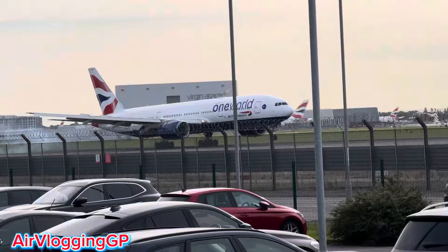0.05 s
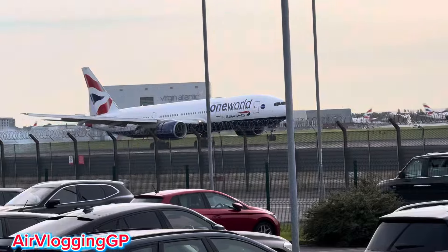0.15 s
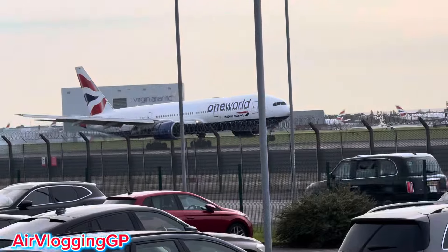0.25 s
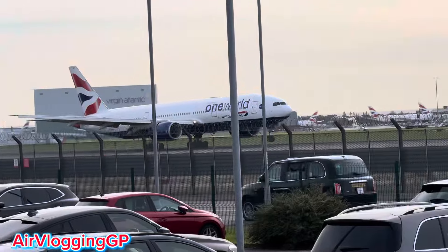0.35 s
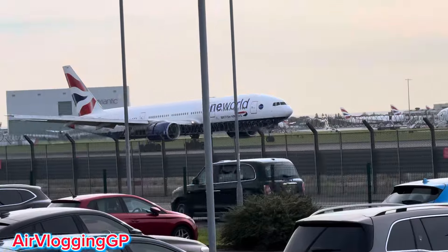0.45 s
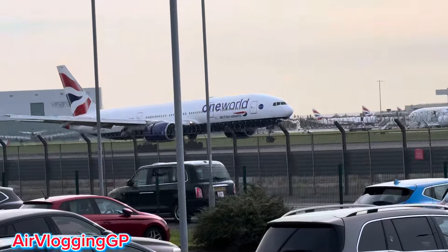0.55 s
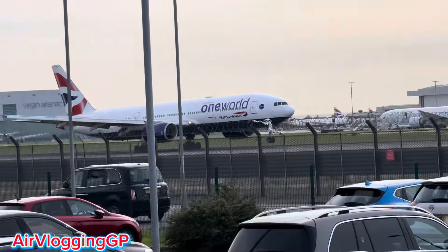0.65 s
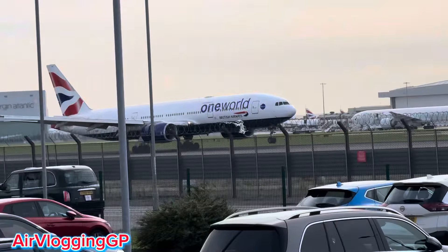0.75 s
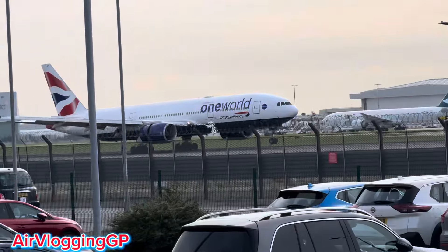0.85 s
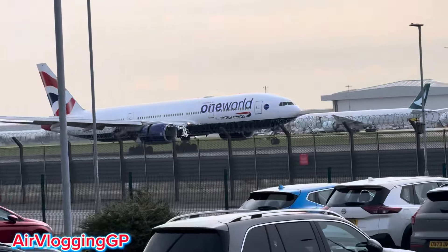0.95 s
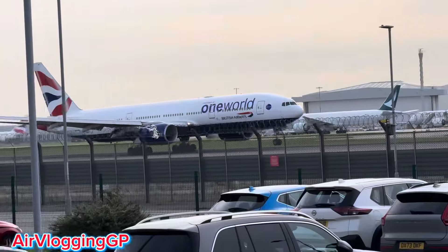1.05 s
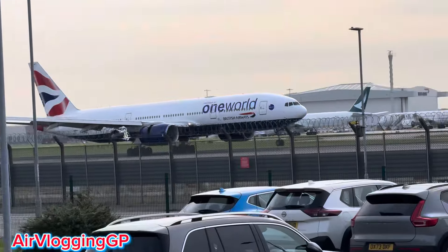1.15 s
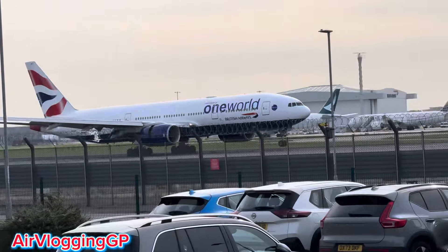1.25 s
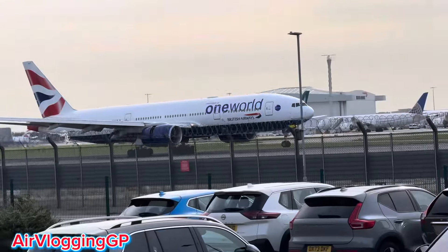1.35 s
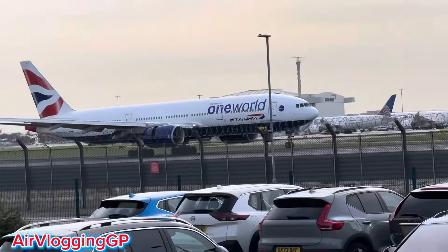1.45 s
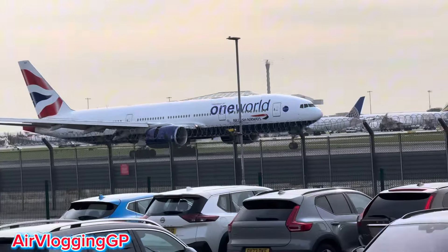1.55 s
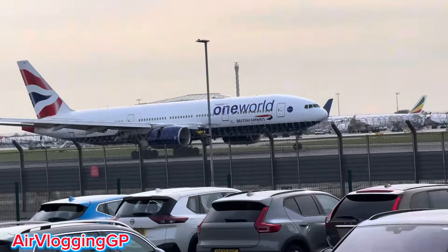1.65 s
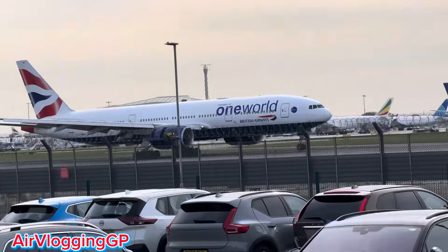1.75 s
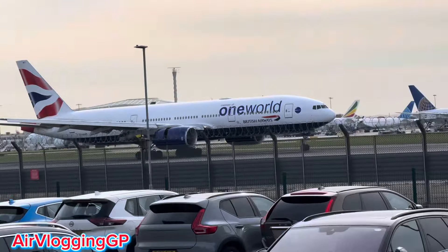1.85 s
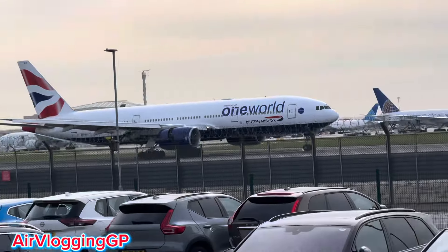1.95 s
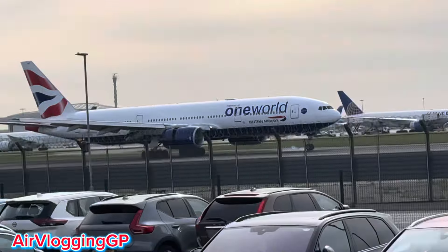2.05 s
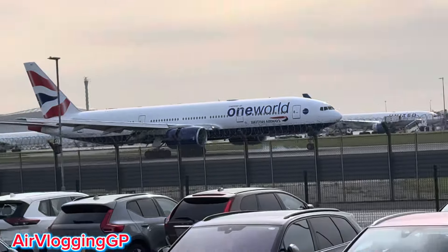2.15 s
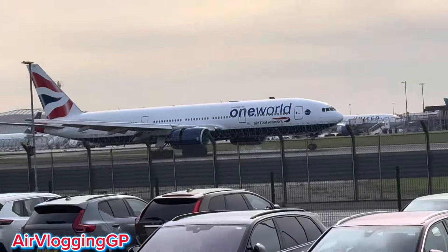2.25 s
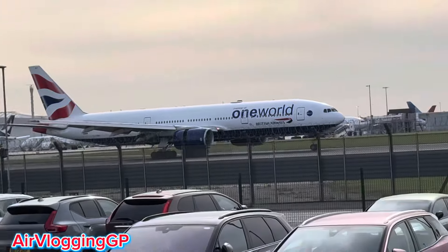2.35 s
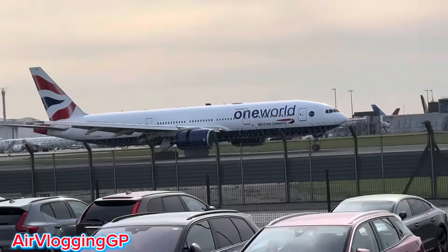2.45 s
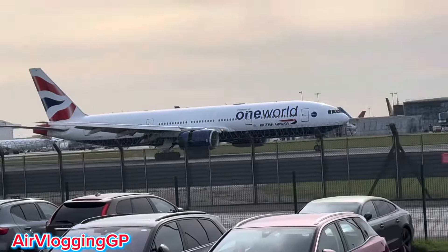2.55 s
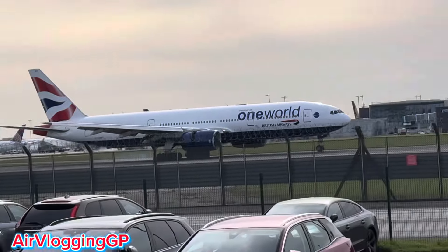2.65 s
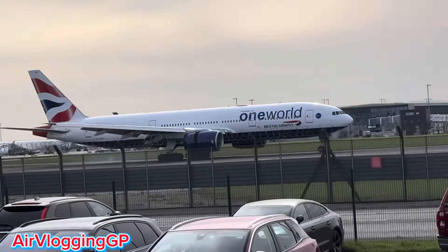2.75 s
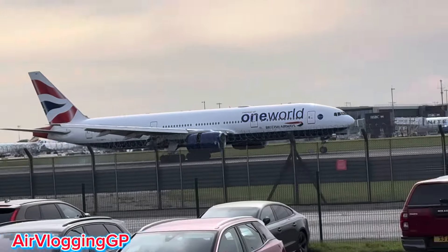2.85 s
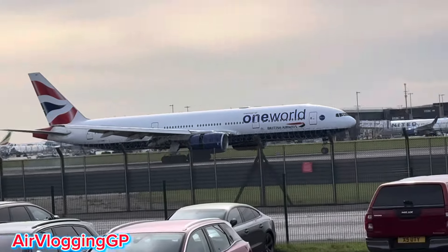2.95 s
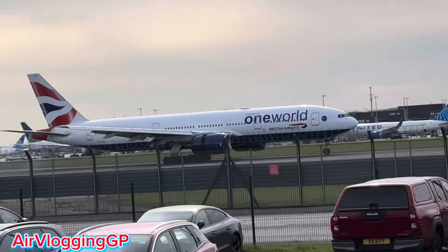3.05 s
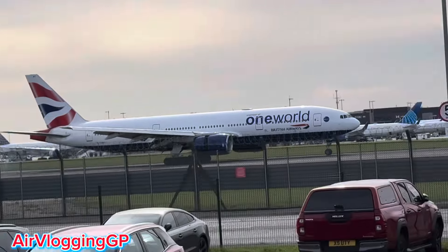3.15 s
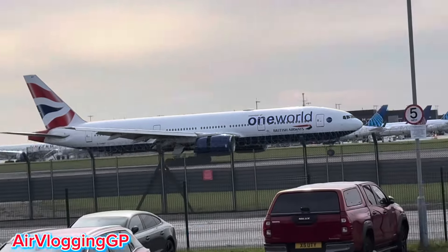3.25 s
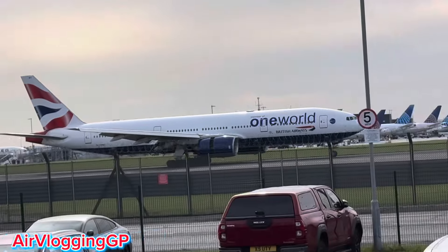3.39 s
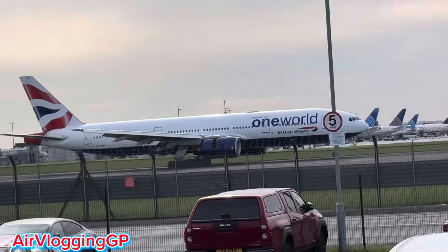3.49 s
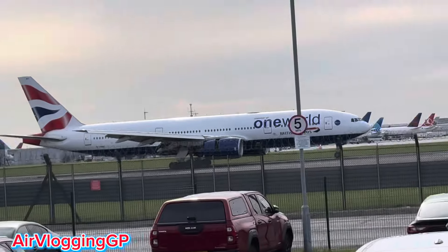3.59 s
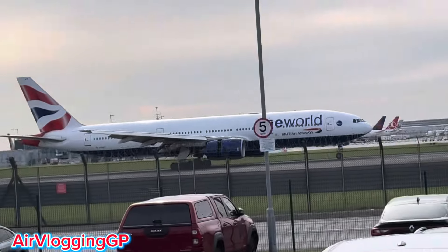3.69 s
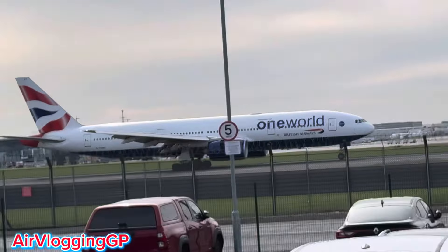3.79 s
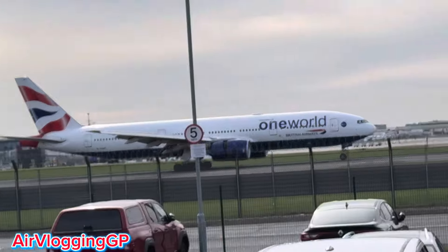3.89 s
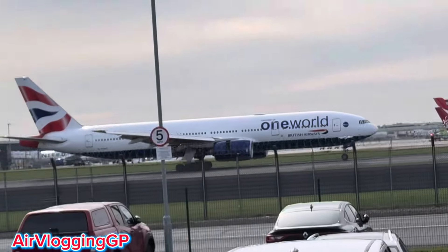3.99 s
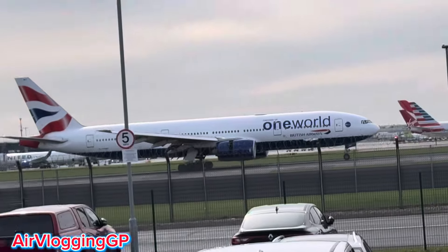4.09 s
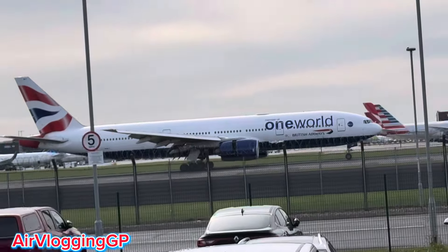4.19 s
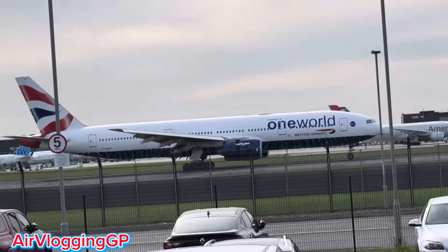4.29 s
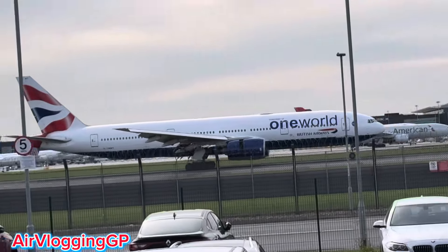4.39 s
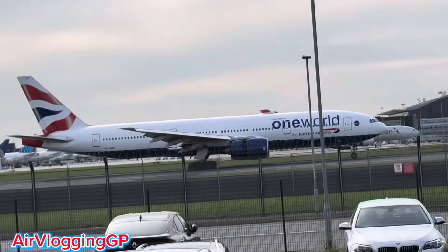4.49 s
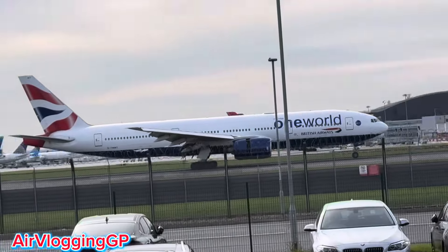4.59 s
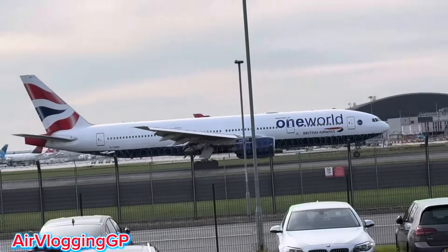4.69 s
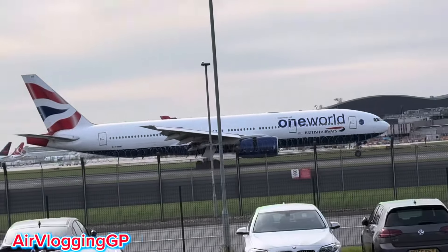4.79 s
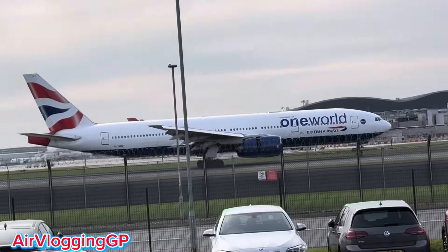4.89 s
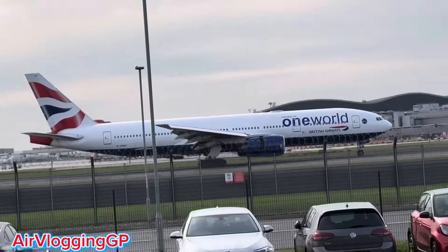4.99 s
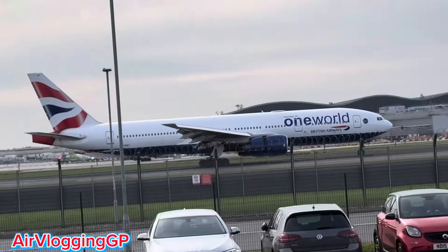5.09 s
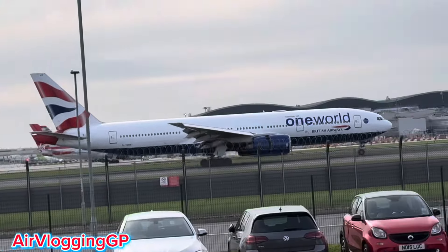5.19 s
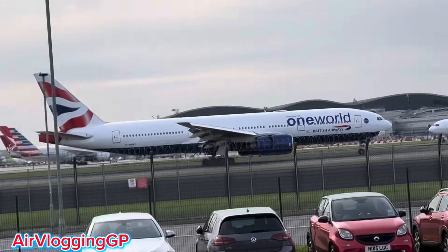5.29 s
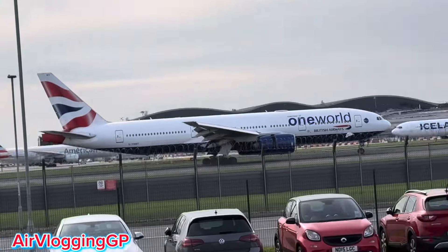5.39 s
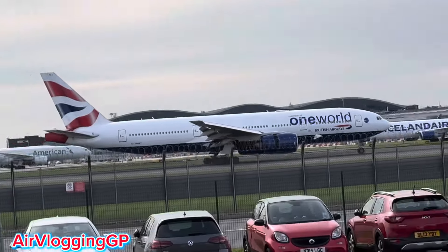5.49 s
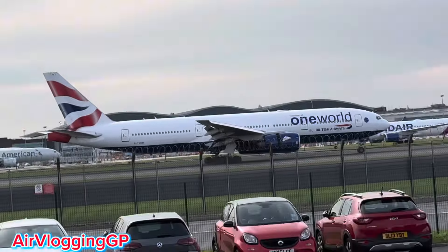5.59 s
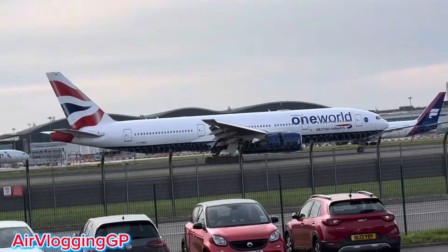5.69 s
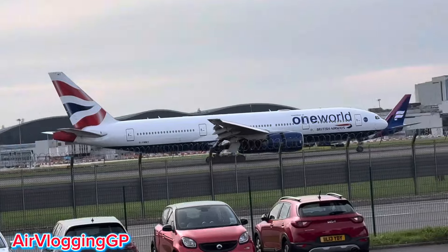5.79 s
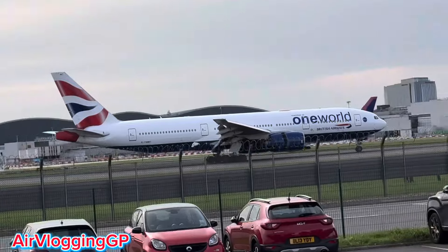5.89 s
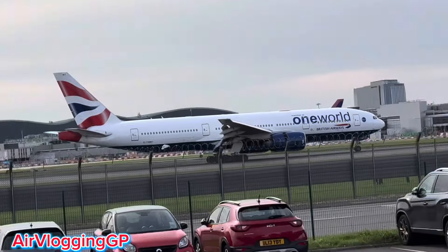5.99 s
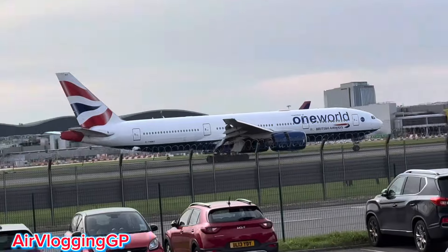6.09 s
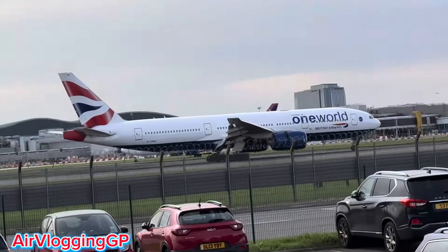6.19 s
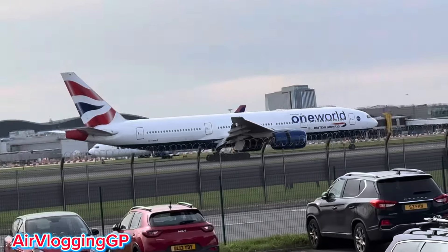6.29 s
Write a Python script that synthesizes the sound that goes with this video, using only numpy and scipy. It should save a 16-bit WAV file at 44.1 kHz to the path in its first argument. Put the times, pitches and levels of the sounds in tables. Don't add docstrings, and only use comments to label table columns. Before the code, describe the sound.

Outdoors beside an airport car park, a large jet rolls past some hundred metres away. A deep rumble and wavering intake howl come first, with a faint high fan tone and a brief tyre scrub. The roar builds in uneven surges to a full reverse-thrust rush midway, then eases but keeps rumbling. A handheld phone picks up light wind buffeting and tiny case ticks.

```python
import sys
import numpy as np
from scipy import signal
from scipy.fft import rfft, irfft, next_fast_len
from scipy.io import wavfile
from scipy.ndimage import uniform_filter1d

SR = 44100
rng = np.random.default_rng(int(sys.argv[2]) if len(sys.argv) > 2 else 0)


def wrap_up_sound(samples):
    columns = np.atleast_2d(samples).T
    tamed = np.clip(columns, -1, 1)
    steps = np.round(tamed * 32767).astype(np.int16)
    wavfile.write(sys.argv[1], SR, steps)


def boost(x):
    u = np.asarray(x, float) / 20
    return 10 ** u


N = 279583
T = np.arange(N) / SR
SIZE = next_fast_len(N)
HZ = np.maximum(np.arange(SIZE // 2 + 1) * SR / SIZE, 1.)

# peak_s, peak_db, length_s
GUSTS = [
    (1.224, -37, .05),
    (1.5, -32, 0.18),
    (2.4, -39.5, .3),
    (3.409, -43.5, 0.74),
    (4.603, -28, 0.045),
    (5.25, -42, 0.13),
    (5.847, -38.5, .2),
]
GUST_FLOOR_DB = -56
# start_s, peak_db
TICKS = [
    (2.373, -70),
    (2.399, -61),
    (3.311, -66),
    (3.389, -65.5),
    (4.9, -66),
]
# time_s, level_db
CAR_HISS = [(0, -93), (.3, -87.5), (.5, -82.5), (.62, -85.5), (.75, -84), (.84, -91), (1.2, -94),
            (1.65, -93), (2.1, -99)]
# freq_hz, unrelated_share_db, left_minus_right_db, left_phase_lead_rad
PORTS = [(40, -34.5, 0, 0), (100, -26.5, 0, 0.014), (250, -12.5, -0.2, .3), (523, -11, -0.5, 0.8),
         (1000, -12, 1.2, 0.75), (1450, -4, 3.5, 0), (1900, -14.5, 5, 0.029), (2080, -17, -3, 0.069),
         (2140, -45, 0, 0), (7600, -47.5, 0, 0.081), (9000, 4.5, -0.5, 0.1)]

# time_s, pitch_hz, level_db
SCRUB = [(1.88, 1450, -51), (2.0, 1638, -35.5), (2.06, 1873, -35), (2.16, 1900, -54)]
# time_s, pitch_hz, level_db
FAN_TONE = [(.5, 3150, -76), (.85, 3260, -68), (1.1, 3250, -68), (1.32, 3210, -66), (1.45, 3100, -62),
            (1.9, 3173, -61), (2.2, 3090, -57)]
# time_s, pitch_hz, level_db
HOWL_OVERTONE = [(1.8, 746, -42), (2.0, 793, -38.5), (2.2, 835, -41), (2.4, 820, -45.5), (2.6, 790, -47)]
# time_s, pitch_hz, level_db
HOWL = [(0, 578, -45), (.6, 561, -45.5), (1.0, 531.4, -42), (1.25, 522, -40), (1.42, 528, -48.5),
        (1.5, 545.7, -43.5), (1.93, 517, -38), (2.28, 541, -36), (2.5, 528, -51)]

# peak_s, peak_db, length_s, centre_hz, width_octaves
PUFFS = [(0.597, -38, 0.049, 563, .031), (.81, -38, .03, 810, .18), (.92, -41.5, 0.055, 900, 0.34),
         (1.32, -49, 0.034, 3260, .03), (1.893, -42, 0.046, 1810, 0.2), (2.077, -52, 0.23, 4100, .35),
         (1.94, -34, 0.065, 500, .07), (2.797, -36.5, 0.049, 535, 0.022), (2.304, -25.5, 0.11, 140, .2),
         (2.978, -21.5, .1, 146, 0.17), (3.35, -33, 0.055, 2740, 0.34), (3.67, -27, 0.18, 662, 0.18),
         (4.325, -38, 0.17, 1500, .08), (4.416, -27.5, .12, 216, 0.33), (4.45, -35.5, .052, 2550, 0.081),
         (4.8, -37, 0.059, 2620, 0.092), (5.094, -40.5, 0.075, 2340, 0.11),
         (5.345, -36.5, 0.058, 695, .038), (5.396, -53, 0.073, 4500, .4), (5.772, -43, 0.042, 4200, 0.41),
         (6.064, -27.5, 0.075, 149, 0.19), (5.03, -74, 0.073, 9000, .11), (5.0, -83, .073, 13700, .03)]
# peak_s, peak_db
GLINTS = [(3.8, -46), (3.98, -48), (4.11, -42.5), (4.35, -47), (5.11, -51), (5.34, -55)]
GLINT_LENGTH_S, GLINT_HZ, GLINT_OCTAVES = .014, 4850, .31

# time_s, level_db
JET = [(0.05, -26), (.2, -28.5), (.7, -22.5), (1.0, -25.5), (1.55, -19), (1.7, -26), (2.15, -15),
       (2.5, -17.5), (2.9, -12.5), (3.1, -15), (3.42, -10.5), (3.65, -16.5), (3.9, -13), (4.6, -13.5),
       (5.1, -16.5), (5.5, -17), (6.05, -18.5), (6.34, -19.5)]
# time_s, level_db
FAN = [(0.05, -45), (1.1, -44.5), (1.6, -41), (1.85, -35.5), (2.05, -34.5), (2.35, -38), (2.7, -34),
       (3.0, -35), (3.33, -28), (3.52, -29), (3.9, -29), (4.2, -31.5), (4.4, -31), (5.0, -31.5),
       (5.5, -34.5), (5.75, -30), (5.95, -32), (6.34, -34.5)]
# time_s, effort (about 1 at full, below 0 turns the surge around)
REVERSER = [(2.6, 0.01), (3.05, .45), (3.4, 0.01), (3.75, 1.01), (4.15, 0.56), (4.7, -.1), (5.4, -.5),
            (5.7, -.25), (6.3, -.1)]
# freq_hz, jet_swell_share, fan_swell_share, reverser_surge_db, nearing_gain_db
ROAR_LAYERS = [
    (65, 0.86, 0.01, -2, 0.6),
    (165, 0.43, 0.46, 2.5, 1),
    (353, .15, 0.52, 8, 1.15),
    (845, 0.01, 0.59, 1, 1.9),
    (2000, 0.01, 1.12, -0.9, -0.4),
    (4400, 0.01, 1.13, -1, 0.5),
    (7200, 0.01, .75, -2.5, 7.5),
    (9000, 0.01, .5, -1.5, 14),
]
# freq_hz, density_db (per Hz)
ROAR_COLOUR = [(18, -33.5), (30, -13.5), (50, 2), (70, 2), (153, -11.5), (239, -20), (708, -25.5),
               (896, -28), (1950, -34), (2360, -32.5), (3690, -41), (4780, -50.5), (5640, -51),
               (7660, -63.5), (8700, -74), (9200, -87), (10900, -90), (18500, -120)]
NEARING_S, NEARING_SPAN_S = 1.85, 0.93


def unit(x):
    return x / np.sqrt(np.mean(x ** 2))


def over_hz(table, column):
    return np.interp(np.log(HZ), np.log([row[0] for row in table]), [row[column] for row in table])


def over_time(table):
    time_s, *columns = np.transpose(table)
    return [np.interp(T, time_s, column) for column in columns]


def walk(rate_hz):
    hold = int(SR / rate_hz)
    levels = np.repeat(rng.standard_normal(400), hold)[:N]
    return unit(uniform_filter1d(uniform_filter1d(levels, hold), hold))


def noise(shape):
    real, imag = rng.standard_normal((2, len(HZ)))
    return unit(irfft((real + 1j * imag) * shape, SIZE)[:N])


def bell(centre_hz, octaves):
    return np.exp(-.5 * (np.log2(HZ / centre_hz) / octaves) ** 2)


def swell(peak_s, peak_db, length_s):
    return boost(peak_db) * np.exp(-.5 * ((T - peak_s) / length_s) ** 2)


def breeze():
    gusts = boost(GUST_FLOOR_DB) + sum(swell(*gust) for gust in GUSTS)
    flutter = boost(3.0 * walk(12))
    return gusts * flutter * noise(bell(90, .7))


def ticks():
    decay_s = .0012
    shape = sum(boost(db) * (T >= s) * np.exp(-np.abs(T - s) / decay_s) for s, db in TICKS)
    return shape * noise(bell(11500, .3))


def car():
    hiss_db, = over_time(CAR_HISS)
    fade_out = np.clip((CAR_HISS[-1][0] - T) / .15, 0, 1)
    shake = boost(2.2 * walk(40))
    grit = np.array([noise(bell(9700, 0.3) * (HZ < 12200)) for port in range(2)])
    peak_db = hiss_db.max()
    tread_db = 11.0 + peak_db + 2.2 * (hiss_db - peak_db)
    tread = boost(tread_db) * noise(bell(7000, .2))
    return fade_out * shake * (boost(hiss_db) * grit + tread)


def width_flashes(level_db, rarity=1.3, share_db=-29.5):
    out = 0
    for hz in np.arange(2200, 4100, 190):
        threshold = rarity * (hz / 2800) ** .7
        gate = np.clip(4.0 * (walk(22) - threshold), 0, 1)
        out = out + gate * noise(np.abs(HZ - hz) < 95) * (hz / 2500) ** -1.2
    return out * boost(level_db + share_db)


def whistle(table, wobble, blur_hz, blur, trim_db):
    pitch_hz, level_db = over_time(table)
    start_s, end_s = table[0][0], table[-1][0]
    fade = np.clip(np.minimum(T - start_s + .02, end_s - T) / 0.035, 0, 1)
    tear = noise(HZ < blur_hz) + 1j * noise(HZ < blur_hz)
    wavering_hz = pitch_hz * (1 + wobble * walk(12))
    carrier = np.exp(2j * np.pi * np.cumsum(wavering_hz) / SR)
    torn = np.real(carrier * (1 + blur * tear)) / np.sqrt(.5 + blur ** 2)
    return fade * boost(level_db + trim_db) * torn


def puffs():
    eddies = sum(swell(s, db, length_s) * noise(bell(hz, octaves)) for s, db, length_s, hz, octaves in PUFFS)
    glints = sum(swell(s, db, GLINT_LENGTH_S) for s, db in GLINTS)
    return eddies + glints * noise(bell(GLINT_HZ, GLINT_OCTAVES))


def roar(flicker_db=0.91, shimmer_db=1.0, level_db=2.5):
    nearing = np.tanh((T - NEARING_S) / NEARING_SPAN_S)
    controls = np.array(over_time(JET) + over_time(FAN) + over_time(REVERSER) + [nearing])
    waves = rfft(rng.standard_normal((2, SIZE))) * boost(over_hz(ROAR_COLOUR, 1))
    waves[1] *= boost(over_hz(PORTS, 1))
    shimmer = walk(11)
    layer_hz, *shares = np.transpose(ROAR_LAYERS)
    out = 0
    for hz in 22 * 2 ** np.arange(0, 10, .5):
        slice_shares = np.array([np.interp(np.log(hz), np.log(layer_hz), share) for share in shares])
        slice_swell = unit(boost(slice_shares @ controls))
        shake_db = flicker_db * walk(9) + shimmer_db * (hz / 6800.0) ** 1.5 * shimmer
        slice_gain = np.cos(np.pi * np.clip(np.log2(HZ / hz), -.5, .5)) ** 2
        out = out + slice_swell * boost(shake_db) * irfft(waves * slice_gain, SIZE)[:, :N]
    jet_rms = np.sqrt(np.mean(boost(controls[0]) ** 2))
    direct_rms = np.sqrt(np.mean(out[0] ** 2))
    return out * jet_rms / direct_rms * boost(level_db)


def scene():
    direct, scattered = roar()
    howl = whistle(HOWL, wobble=.013, blur_hz=20, blur=0.74, trim_db=0.2)
    overtone = whistle(HOWL_OVERTONE, wobble=0.0121, blur_hz=26, blur=2.0, trim_db=-2.0)
    fan_tone = whistle(FAN_TONE, wobble=0.0093, blur_hz=79, blur=3.0, trim_db=10.5)
    scrub = whistle(SCRUB, wobble=.02, blur_hz=140, blur=2.2, trim_db=-2.0)
    direct = direct + howl + overtone + fan_tone + scrub + puffs()

    howl_echo = boost(-8.5) * np.roll(howl, 900)
    fan_db, = over_time(FAN)
    scattered = scattered + howl_echo + width_flashes(fan_db) + breeze()

    skew = boost(over_hz(PORTS, 2) / 2) * np.exp(.5j * over_hz(PORTS, 3))
    wave = rfft(direct, SIZE)
    ports = irfft(np.array([wave * skew, wave / skew]), SIZE)[:, :N]
    return ports + np.array([scattered, -scattered]) + car() + ticks()


def top_cut(x):
    return signal.sosfilt(signal.butter(12, 14966, fs=SR, output="sos"), x)


def record(dry):
    low_cut = signal.butter(1, 30, "high", fs=SR, output="sos")
    x = signal.sosfiltfilt(low_cut, dry, padtype="even")
    x = np.tanh(.5 * x) / .5
    bass = signal.sosfilt(signal.butter(2, 160, fs=SR, output="sos"), x)
    mirror_hz = 9600
    x = x + boost(-65.0) * bass * np.cos(2 * np.pi * mirror_hz * T)
    x = x + boost(-101) * noise(np.abs(HZ - 13900) < 750)
    return top_cut(x)


dry = scene()
out = record(dry)
wrap_up_sound(out)
```